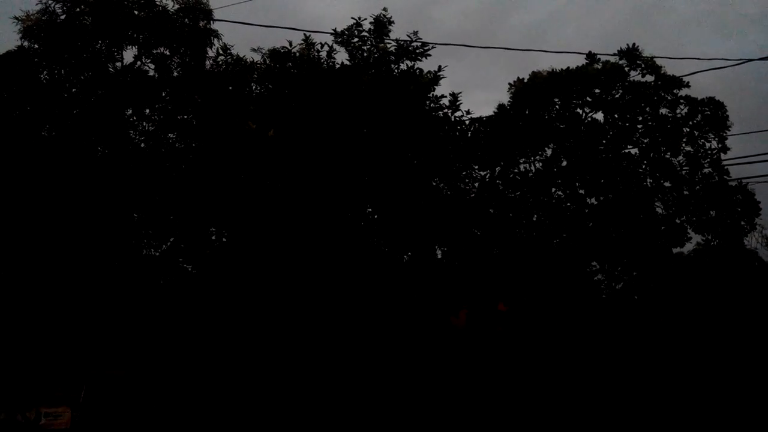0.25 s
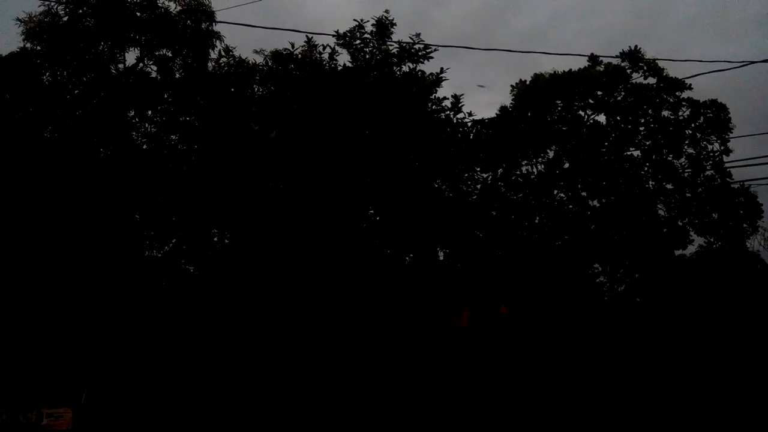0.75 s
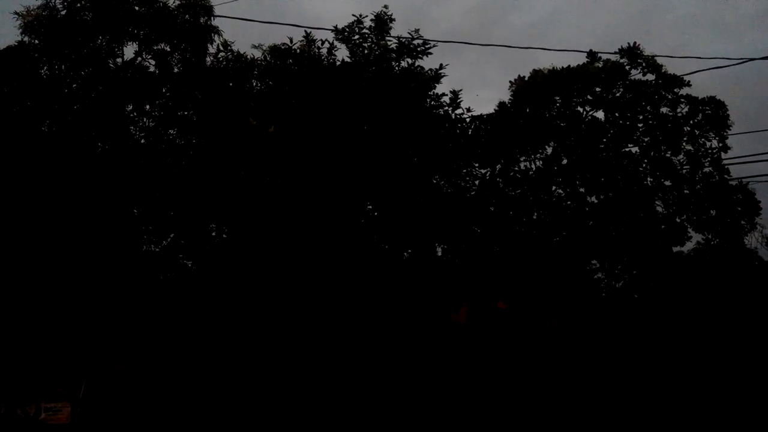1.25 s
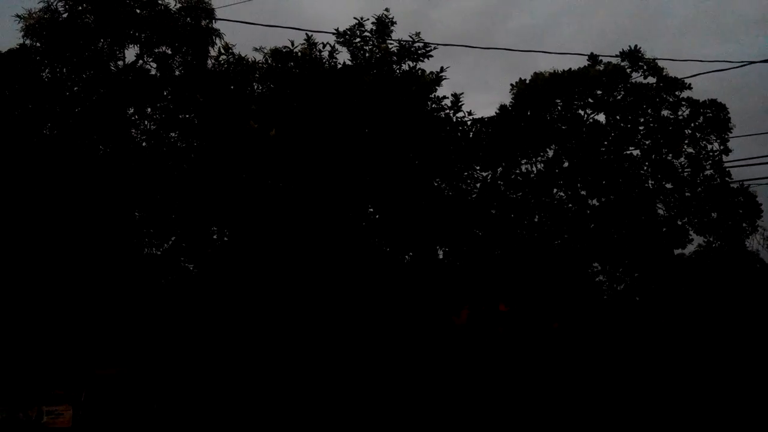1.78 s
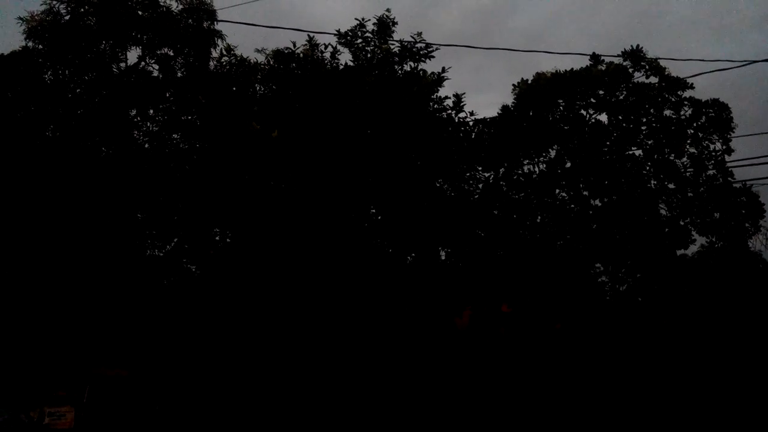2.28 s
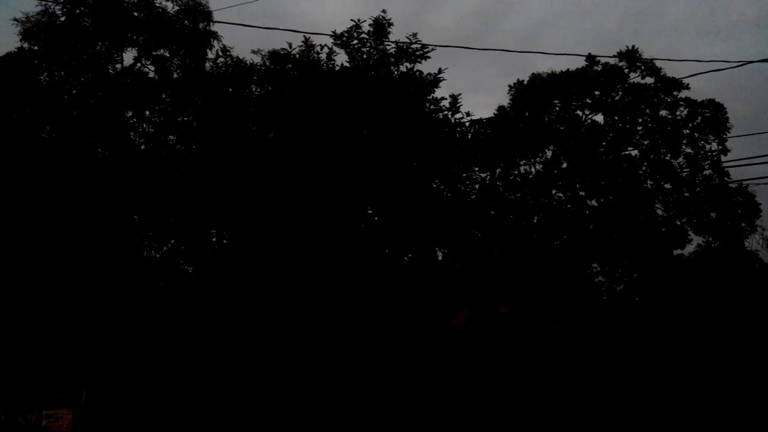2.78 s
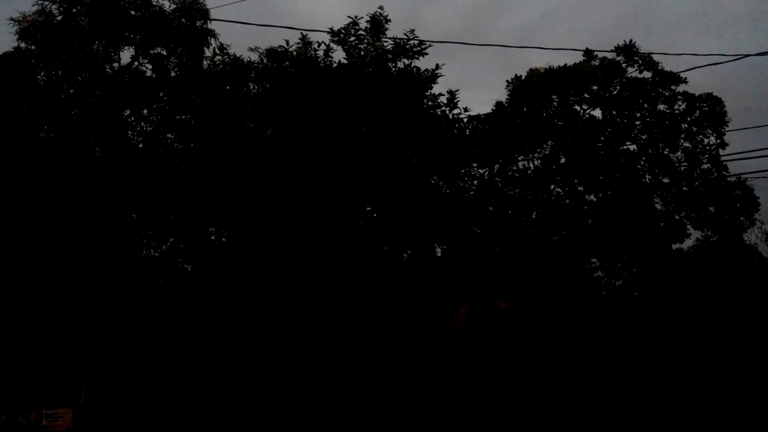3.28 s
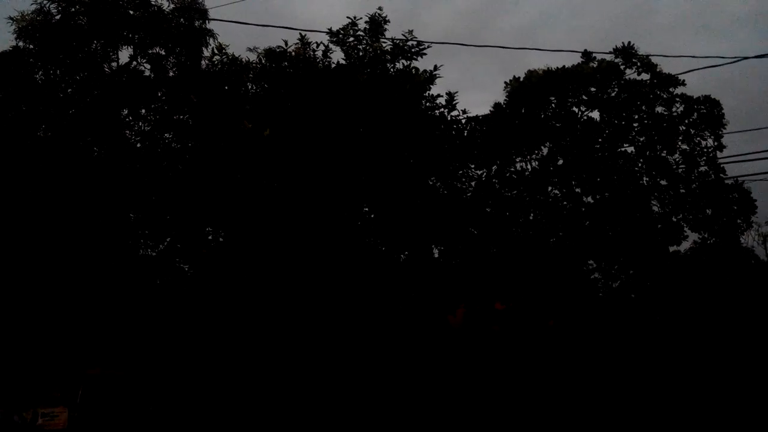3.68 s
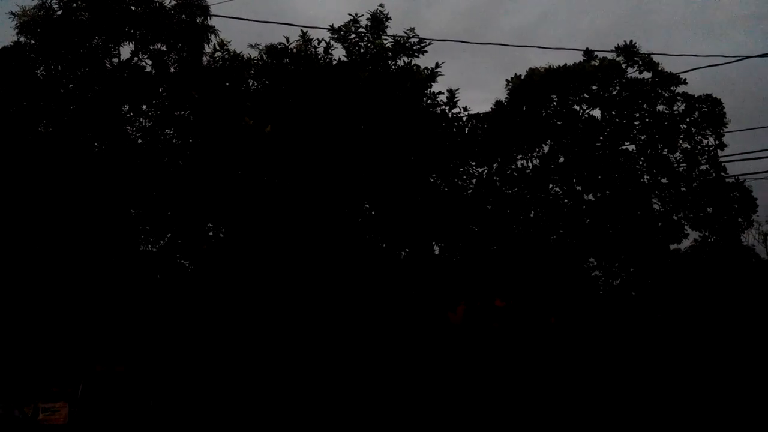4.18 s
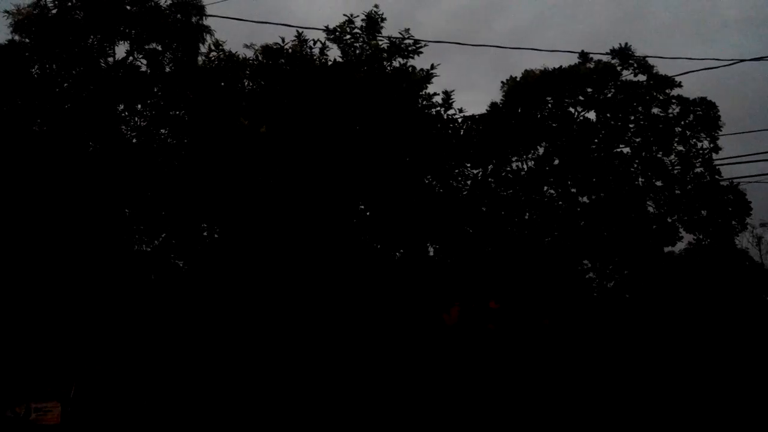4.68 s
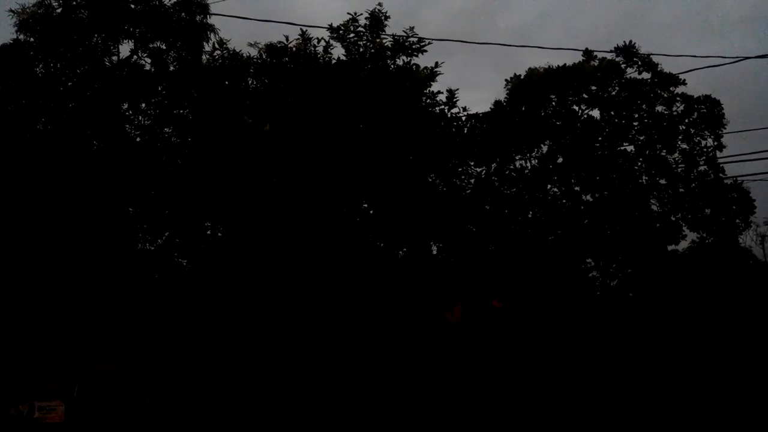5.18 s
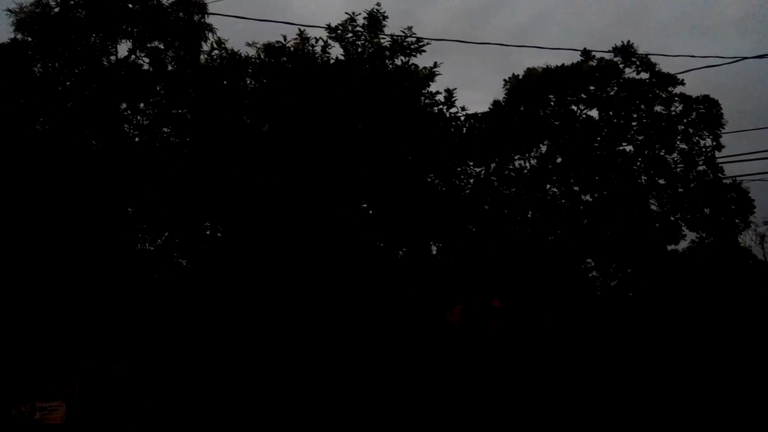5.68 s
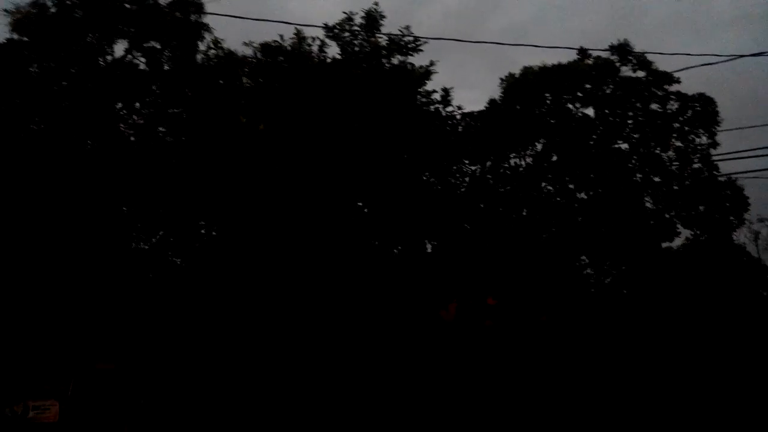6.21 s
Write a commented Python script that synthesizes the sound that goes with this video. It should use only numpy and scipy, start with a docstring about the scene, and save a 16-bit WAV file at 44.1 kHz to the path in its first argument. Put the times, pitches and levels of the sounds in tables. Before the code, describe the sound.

Outdoors at dawn, a large flock of small birds chatters without pause in dark trees: quick, rough, falling chirps over a hissy blur of farther birds. Clearer whistles poke out throughout, softened by leaves. Under them runs a steady low traffic rumble, swelling gently as vehicles pass. A very faint sinking whine fades early. The small stereo microphone makes the birds wide, the bass central.

```python
"""From the start, a flock of small birds chatters in dark trees at dawn: random chirps over patchy hiss, far roads
rumbling below as shaped noise, and a faint whine of two sine waves that sinks and ends by 1.6 s.
Clear calls join at 0.2 s: arched, falling whistles, blurred by leaves and walls. The traffic drone swells as
vehicles pass near 1.8, 3.3 and 4.0 s, and short unsteady hoots, also sine waves, drift by from 5.1 s.
A small stereo camera hears bass alike on both sides, and the birds' treble in opposite phase, louder on the right."""
import sys
import numpy as np
from scipy import signal
from scipy.fft import rfft, irfft, next_fast_len
from scipy.io import wavfile
from scipy.ndimage import uniform_filter1d, map_coordinates

SR = 44100
rng = np.random.default_rng(int(sys.argv[2]) if len(sys.argv) > 2 else 0)


def inscribe(sig):
    """Save sig as 16-bit PCM at rate SR to the path in sys.argv[1].

    A 1-D sig is mono; a 2-D sig holds one channel per row.
    Samples are clipped to [-1, 1] before scaling.
    """
    pcm = np.round(np.clip(np.atleast_2d(sig).T, -1, 1) * 32767)
    wavfile.write(sys.argv[1], SR, pcm.astype(np.int16))


N = 284445  # length in samples

# How the flock's chatter swells and lulls.
# Each row: time in seconds, change of the low voices in dB, change of the high voices in dB.
CHATTER_SWELL = [(0, -2.5, 7), (.05, 2, 5), (.23, 1.5, 6), (.35, 5, 4), (.39, -6, 3), (.5, 4, -2),
                 (.64, -6, -7.5), (.71, 4, 6), (.98, -1.5, -0.5), (1.29, 3, 2.5), (1.4, -0.5, -2),
                 (1.72, 2.5, 2.5), (2.14, 3, -5), (2.42, 2, 4.5), (2.62, 7, 5), (2.81, 2.5, -2),
                 (3.0, -2.5, 0), (3.26, 1, -1.5), (3.33, 5, 6.5), (3.58, -2, -1), (3.67, -3.5, -16),
                 (3.73, -4, 2), (3.76, -1, -4.5), (4.2, 2, 1.5), (4.37, -3, -5.5), (4.43, 2, -3),
                 (4.51, -5.5, -6.5), (4.58, 0.5, 2), (4.84, 4.5, 2.5), (5.06, 1, -2), (5.54, -3, -3),
                 (5.74, 1.5, -1), (5.9, -3, -11.5), (5.97, 0.5, 6), (6.03, -0.5, -7), (6.14, -1.5, 2),
                 (6.27, -2.5, -13), (6.35, -11, -10), (6.38, -1.5, -4), (6.44, 0.5, -4)]
# Tone colour of the far roads. Each row: frequency in Hz, relative noise level in dB per Hz.
ROAR_SPECTRUM = [(15, -69), (25, -39), (44, -6.5), (124, -0.5), (220, -6.5), (593, -27.5), (1050, -33.5),
                 (1150, -35), (1600, -39.5), (2080, -67.5), (3520, -120)]
# Tone colour of the traffic drone. Each row: frequency in Hz, relative noise level in dB per Hz.
DRONE_SPECTRUM = [(40, -30.5), (65, 0.5), (125, 9), (175, 1.5), (230, -11), (500, -120)]
# How alike traffic is on both sides. Each row: frequency in Hz, left-right likeness (1 is identical).
TRAFFIC_ALIKE = [(100, .994), (250, .98), (500, .9), (1000, .8)]
# Brief drops of the whine. Each row: time in seconds, half-width in seconds, level change in dB.
WHINE_LULLS = [(.25, .03, -10), (.75, .13, -12), (1.06, .03, -9)]
# The clearest calls, before the birds are mixed.
# Each row: start in seconds, top pitch in Hz, length in seconds, level in dB.
CLEAR_CALLS = [(0.194, 6600, 0.044, 14), (0.259, 5210, 0.035, 0), (0.697, 4980, 0.031, 11),
               (0.893, 3420, 0.022, 8), (0.971, 6540, 0.05, 5.5), (1.038, 6300, 0.046, 21),
               (1.07, 5100, .018, 6), (1.105, 4180, 0.035, 5), (1.24, 6220, 0.051, 8),
               (1.69, 6510, 0.039, 9.5), (1.956, 6015, 0.028, 16), (1.978, 6000, 0.032, 18.5),
               (2.006, 5210, 0.034, 12), (2.339, 6270, .025, 7.5), (2.549, 6120, 0.06, 6.5),
               (2.49, 2750, 0.031, 9), (2.496, 3760, .035, 6.5), (2.626, 6080, 0.037, 9.5),
               (2.7, 2800, 0.049, 13), (2.742, 4140, 0.038, 8), (2.879, 6190, 0.041, 10.5),
               (2.871, 3910, 0.058, 3), (3.004, 6700, 0.047, 10.5), (3.112, 3960, 0.041, 7),
               (3.229, 6560, 0.026, 15), (3.3, 4400, .05, 5.5), (3.314, 3400, 0.07, 3.5),
               (3.348, 5670, 0.053, 6.5), (3.408, 4300, 0.034, 8.5), (3.532, 6300, 0.016, 10),
               (3.543, 5420, 0.031, 4.5), (3.818, 6050, 0.044, 7), (3.948, 6190, 0.06, 8),
               (4.008, 6670, 0.029, 13), (4.573, 6750, 0.053, 4), (4.644, 3980, 0.051, 7.5),
               (4.703, 4360, 0.03, 4), (4.704, 6280, 0.043, 8), (4.754, 5940, 0.041, 11),
               (4.791, 6360, 0.026, 24.5), (4.794, 3500, 0.024, 11), (4.802, 5820, 0.039, 15.5),
               (4.816, 6310, 0.04, 12), (4.85, 3720, 0.035, 11.5), (4.898, 3780, 0.051, 2),
               (4.959, 6160, 0.021, 8), (5.132, 6720, 0.061, 10.5), (5.334, 3506, 0.033, 5),
               (5.568, 6340, 0.081, 5.5), (5.953, 6100, 0.024, 4), (5.961, 5400, .035, 7.5),
               (6.045, 6200, .04, 6.5), (6.108, 6570, 0.042, 7), (6.292, 6300, 0.036, 3.5)]
# Vehicles passing by, heard as a low drone that swells and sinks.
# Each row: time when nearest in seconds, speed in m/s, nearest distance in m, level there in dB.
VEHICLE_PASSES = [(1.752, 48, 4.4, -40.5), (3.297, 33.6, 18, -36), (3.999, 38, 9.6, -36)]
# Faint short tones.
# Each row: start in seconds, length in seconds, pitch in Hz, glide in Hz per second, starting level in dB.
HOOTS = [(5.11, .12, 1078, 0, -75), (5.24, .26, 2440, 0, -55.5), (5.36, .12, 1200, 0, -73),
         (5.68, .46, 1080, -15, -69.5), (5.73, .19, 2005, 0, -63), (6.0, .18, 925, 0, -77),
         (6.02, .09, 2440, 0, -52.5), (6.1, .17, 1835, -100, -62), (6.245, .09, 2250, 5000, -50.5)]
# How the microphone pair hears the birds. Each row: frequency in Hz, left gain in dB, right gain in dB,
# left-right likeness (1 is identical, 0 unrelated, -1 opposite phase).
BIRD_MICROPHONES = [(600, -48.5, -49.5, .8), (1085, -36, -34.5, 1), (1850, -16.5, -16.5, 0.69),
                    (2500, -15.5, -15, 0.84), (2742, -11, -12, 0.65), (3670, -2.5, -0.5, 0.41),
                    (4980, -3, -2.5, -0.033), (5510, -6.5, 3.5, -0.47), (6090, -3, 5.5, -0.7),
                    (6130, -4.5, 1.5, -0.75), (6337, -9.5, 1.5, -0.73), (7076, -10.5, -12.5, -0.8),
                    (7430, -18.5, -19, -0.56), (8520, -33, -35.5, -1.015)]

# A call's whole drop in Hz per second of its length, at the reference pitch; higher voices fall faster,
# by this power of pitch.
FALL_HZ_PER_S, FALL_POWER, REFERENCE_HZ = 26000, 1.575, 6000
ATTACK_SHARE, RELEASE_POWER = 0.14, 0.16  # a call starts fast, then thins out as it falls
CLEAR_ROUGH, CROWD_ROUGH = .95, .9  # depth of shiver and flutter
# Two kinds of voice in the crowd: lowest and highest top pitch in Hz, and the share of high voices.
LOW_VOICES, HIGH_VOICES, HIGH_SHARE = (2300, 5600), (5600, 7300), .35
WALL_S, WALL_DB = 0.05, -14  # a house front throws each clear call back once
WHINE_HZ, WHINE_END_HZ, SETTLE_S = 806, 738, .52  # first pitch, pitch it sinks towards, settling time
# Starting levels in dB and fades in dB per second, for the whine and the octave above it.
WHINE_DB, WHINE_FADE, OCTAVE_DB, OCTAVE_FADE, WHINE_STOP_S = -68.5, 4, -58, 25, 1.62
DRONE_DB, SURGE_DB = -42.5, 0.5  # the drone between passes, and how unsteady it is
HOOT_FLICKER_DB, HOOT_SHIVER = 2.5, .011  # unsteadiness in level and, as a share, in pitch
TOP_HZ = 8700  # upper limit of the camera


def amp(db):
    """Turn a level in dB into a gain."""
    return 10 ** (np.asarray(db) / 20)


def unit(x):
    """Scale x to an rms (average strength) of 1."""
    return x / np.sqrt(np.mean(x ** 2) + 1e-20)


def along(points, hz):
    """Read the columns after the frequency at hz, on a log axis."""
    f, *cols = np.transpose(points)
    return np.array([np.interp(np.log(hz + 1), np.log(f + 1), c) for c in cols])


def curves(rows, s):
    """Read each column after the time at times s."""
    times, *cols = np.transpose(rows)
    return [np.interp(s, times, c) for c in cols]


def waver(rate):
    """Draw a smooth random curve with this many random points a second."""
    points = rng.standard_normal(int(N * rate / SR) + 4)
    return map_coordinates(points, [np.arange(N) * rate / SR])


def filtered(x, response):
    """Change the strength of each frequency in x by response(Hz)."""
    m = next_fast_len(N + SR // 2)
    return irfft(rfft(x, m) * response(np.fft.rfftfreq(m, 1 / SR)), m)[..., :N]


def stereo(pair, gain, alike):
    """Blend two unrelated signals into left and right, as alike as alike(Hz) says."""
    turn = lambda hz: np.arccos(np.clip(alike(hz), -1, 1)) / 2
    mid, side = filtered(pair, lambda hz: [np.cos(turn(hz)), np.sin(turn(hz))])
    return filtered(np.array([mid + side, mid - side]), gain)


def chatter_db(s, hz):
    """The flock's swell: low voices under 4 kHz, high ones over 5.3 kHz, a blend between."""
    low, high = curves(CHATTER_SWELL, s)
    share = np.clip((hz - 4000) / 1300, 0, 1)
    return (1 - share) * low + share * high


def far_flock():
    """Birds too far to tell apart: patchy hiss that swells with the chatter."""
    hz, s, z = signal.stft(rng.standard_normal((2, N)), SR, nperseg=256)
    patches = uniform_filter1d(rng.standard_normal(z.shape[1:]), size=4, axis=0)
    patches = uniform_filter1d(patches, size=8, axis=1)
    level_db = 2.72 * unit(patches) + 0.43 * chatter_db(s, hz[:, None])
    hiss = signal.istft(z * amp(level_db), SR, nperseg=256)[1]
    return unit(hiss[:, :N])


def call_end_hz(top_hz, length):
    """A longer or higher call falls further below its top pitch."""
    return top_hz - FALL_HZ_PER_S * length * (top_hz / REFERENCE_HZ) ** FALL_POWER


def chirps(start, top_hz, end_hz, length, db, perches, swell, rough):
    """Each call arches up to its top, then falls; returns one dry track per perch."""
    t = np.arange(SR // 12) / SR
    col = lambda v: v[:, None]
    u = np.minimum(t / col(length), 1)  # progress through the call, 0 to 1
    luck = rng.random((len(start), 3))
    # the top comes a quarter of the way in; the rise bends more steeply than the fall
    bend = np.where(u < .25, 2.5, 1) * ((u - .25) / .75) ** 2
    hz = col(top_hz) - col(top_hz - end_hz) * bend
    # an unsteady voice: the pitch shivers at random about its contour
    shiver = uniform_filter1d(rng.standard_normal(hz.shape), size=40, axis=1)
    phase = 2 * np.pi * np.cumsum(hz + 75 * rough * unit(shiver), axis=1) / SR
    # the syrinx (a bird's voice organ) flutters 130 to 300 times a second, which roughens the whistle
    flutter = np.sin(2 * np.pi * (t * (130 + 170 * luck[:, :1]) + luck[:, 1:2]))
    tone = np.sin(phase + 0.74 * rough * flutter) * (1 + 0.58 * rough * flutter)
    tone += amp(-21.5) * np.sin(2 * phase)  # a faint octave above
    tone *= np.minimum(u / ATTACK_SHARE, 1) * (1 - u) ** RELEASE_POWER
    tone *= np.minimum((1 - u) / 0.088, 1)  # a soft end
    tone *= amp(col(db) + swell * chatter_db(col(start) + t, hz))
    # add every call into the track of a random perch
    perch = (luck[:, 2] * perches).astype(int)
    first_sample = perch * (N + SR) + np.round(start * SR).astype(int)
    at = col(first_sample) + np.arange(len(t))
    tracks = np.bincount(at.ravel(), tone.ravel(), perches * (N + SR))
    return tracks.reshape(perches, -1)[:, :N]


def trees(dry, echo_db, t60):
    """Sound reaches the front and side capsules a quarter cycle apart, then scattered by leaves and walls."""
    t = np.arange(SR // 3) / SR
    # random echoes after 2 ms, falling 60 dB in t60 seconds
    tail = rng.standard_normal((2, len(dry), len(t))) * amp(-60 * t / t60) * (t > .002)
    tail *= amp(echo_db) / np.linalg.norm(tail, axis=2, keepdims=True)
    m = next_fast_len(N + SR // 2)
    turn = (-1) ** np.arange(len(dry))[:, None] * 1j  # the quarter cycle, its sign alternating by perch
    paths = rfft(tail, m) + np.array([np.ones_like(turn), turn])
    return irfft((paths * rfft(dry, m)).sum(axis=1), m)[:, :N]


def crowd_calls():
    """1400 chirps with random times and pitches follow the flock's swell and scatter in the trees."""
    luck = rng.random((1400, 6))
    is_high = luck[:, 5] < HIGH_SHARE
    lowest, highest = np.where(is_high, np.c_[HIGH_VOICES].T, np.c_[LOW_VOICES].T)
    top = lowest + (highest - lowest) * luck[:, 1]
    length = .018 + .03 * luck[:, 3]
    end = call_end_hz(top, length * (1.1 + 1.4 * luck[:, 2]))  # these fall further than clear calls
    dry = chirps(luck[:, 0] * N / SR, top, end, length, -7 * luck[:, 4],
                 perches=4, swell=1.0, rough=CROWD_ROUGH)
    return unit(trees(dry, echo_db=4.0, t60=0.21))


def road_noise(spectrum):
    """Random noise shaped by a spectrum, nearly the same on both sides in the bass."""
    return unit(stereo(rng.standard_normal((2, N)), lambda hz: amp(along(spectrum, hz)),
                       lambda hz: along(TRAFFIC_ALIKE, hz)[0]))


def far_roads():
    """Distant roads blend into a roar whose level wavers only a little."""
    return amp(-45.5 + 0.5 * waver(1.2) + 0.86 * waver(8.2)) * road_noise(ROAR_SPECTRUM)


def whine():
    """A receding whine and its octave sink in pitch and fade, with brief drops in level."""
    t = np.arange(N) / SR
    hz = WHINE_END_HZ + (WHINE_HZ - WHINE_END_HZ) * np.exp(-t / SETTLE_S)
    phase = 2 * np.pi * np.cumsum(hz + 3 * waver(20.4)) / SR
    ground = amp(WHINE_DB - WHINE_FADE * t) * np.sin(phase)
    octave = amp(OCTAVE_DB - OCTAVE_FADE * t) * np.sin(2 * phase)
    ending = np.clip((WHINE_STOP_S - t) / 0.17, 0, 1)
    lull_db = sum(depth_db * np.exp(-((t - s) / width) ** 2) for s, width, depth_db in WHINE_LULLS)
    return np.sqrt(2) * (ground + octave) * ending * amp(lull_db)


def clear_calls():
    """Falling whistles scatter in the trees, and a house front returns them once with the capsules swapped."""
    start, top_hz, length, db = np.transpose(CLEAR_CALLS)
    dry = chirps(start, top_hz, call_end_hz(top_hz, length), length, db,
                 perches=4, swell=0, rough=CLEAR_ROUGH)
    near = trees(dry, echo_db=0, t60=0.15)
    delayed = np.pad(near, ((0, 0), (round(WALL_S * SR), 0)))[:, :N]
    return near + amp(WALL_DB) * delayed[::-1]


def birds():
    """The far flock, the crowd and the clear calls, as the microphones colour them."""
    mix = amp(-25.5) * far_flock() + amp(-29) * crowd_calls() + amp(-37.5) * clear_calls()
    return stereo(mix, lambda hz: amp(along(BIRD_MICROPHONES, hz)[:2]),
                  lambda hz: along(BIRD_MICROPHONES, hz)[2])


def passing_drone():
    """A low drone swells as each vehicle comes nearer, then sinks with its growing distance."""
    t = np.arange(N) / SR
    swell = sum(amp(db) * m ** 2 / (m ** 2 + (speed * (t - s)) ** 2) for s, speed, m, db in VEHICLE_PASSES)
    level = np.hypot(amp(DRONE_DB), swell) * amp(SURGE_DB * waver(1.9))
    return level * road_noise(DRONE_SPECTRUM)


def hoots():
    """Short fading sine tones, some gliding, flicker in level and shiver in pitch."""
    t = np.arange(N) / SR
    out = np.zeros(N)
    for s, length, start_hz, glide, start_db in HOOTS:
        edge = np.clip(np.minimum((t - s) / .02, (s + length - t) / 0.082), 0, 1)
        level_db = start_db - 6 * (t - s) + HOOT_FLICKER_DB * waver(45)
        hz = (start_hz + glide * np.clip(t - s, 0, length)) * (1 + HOOT_SHIVER * waver(70))
        out += np.sqrt(2) * amp(level_db) * edge * np.sin(2 * np.pi * np.cumsum(hz) / SR)
    return out


def scene():
    """Birds over traffic, with faint tones alike on both sides that waver in the moving air."""
    tones = (whine() + hoots()) * amp(2.5 * waver(16))
    return birds() + far_roads() + passing_drone() + tones


def record(dry):
    """The camera keeps nothing above its band limit."""
    return filtered(dry, lambda hz: hz < TOP_HZ)


dry = scene()
out = record(dry)
inscribe(out)
```